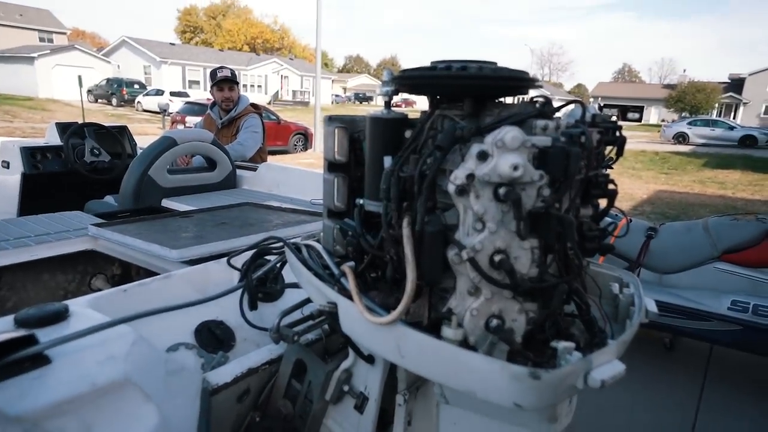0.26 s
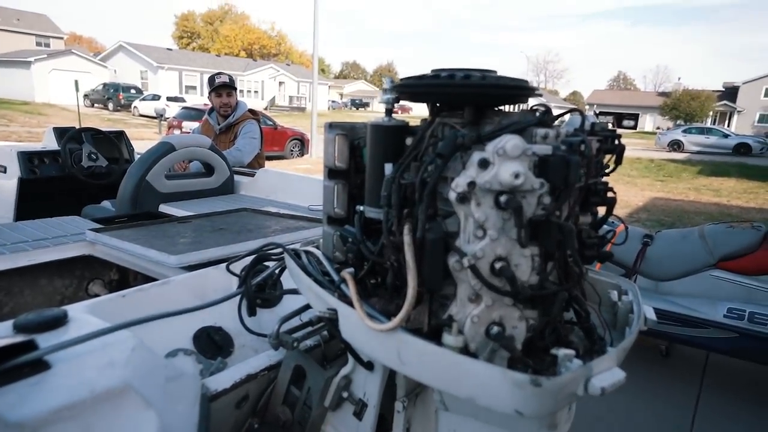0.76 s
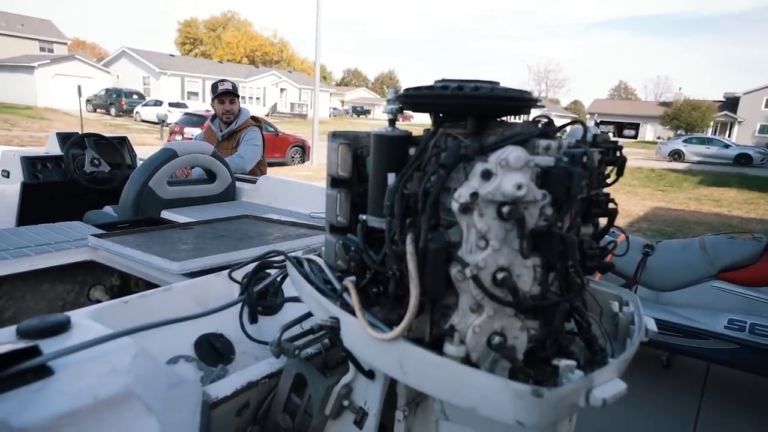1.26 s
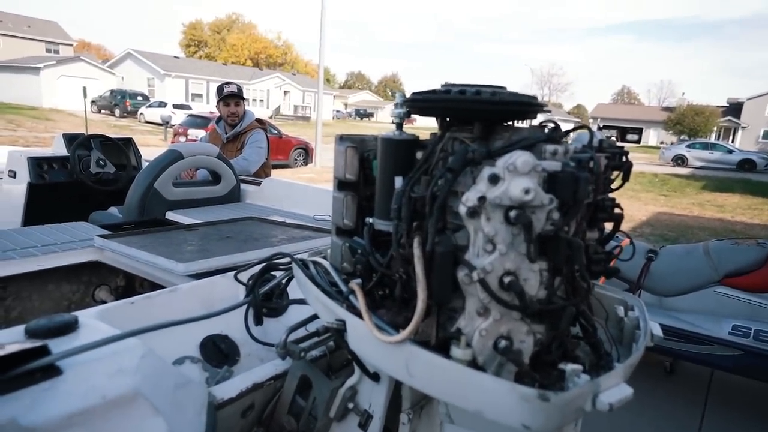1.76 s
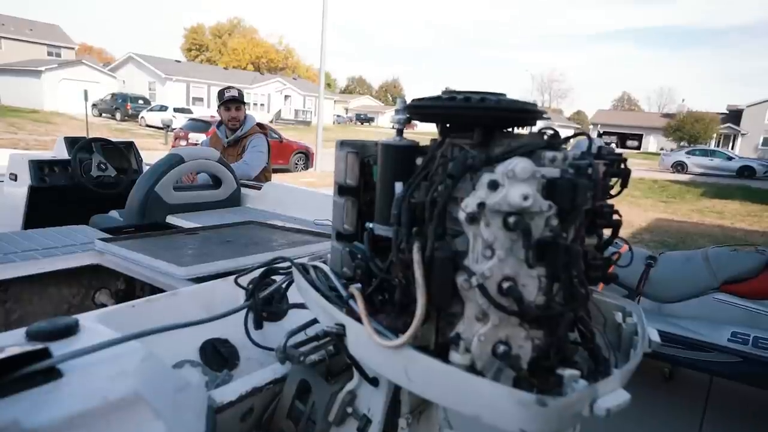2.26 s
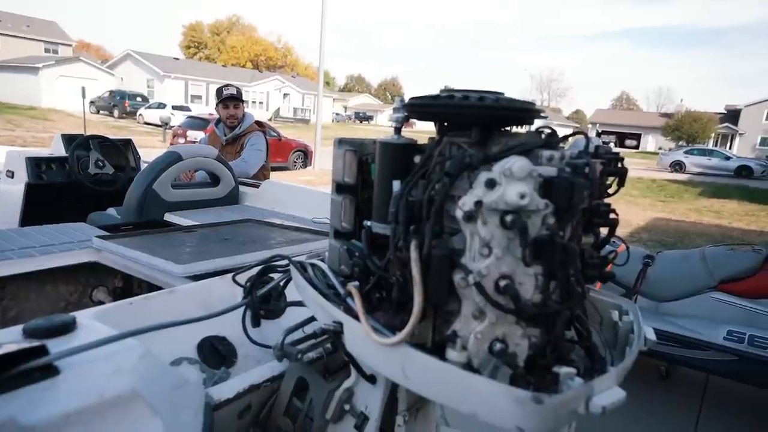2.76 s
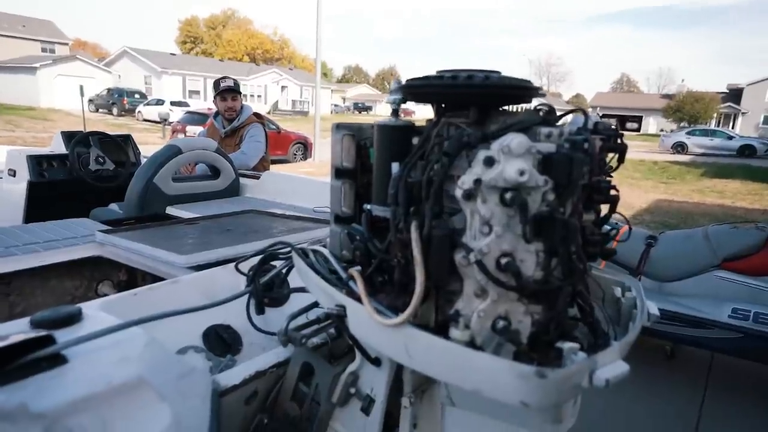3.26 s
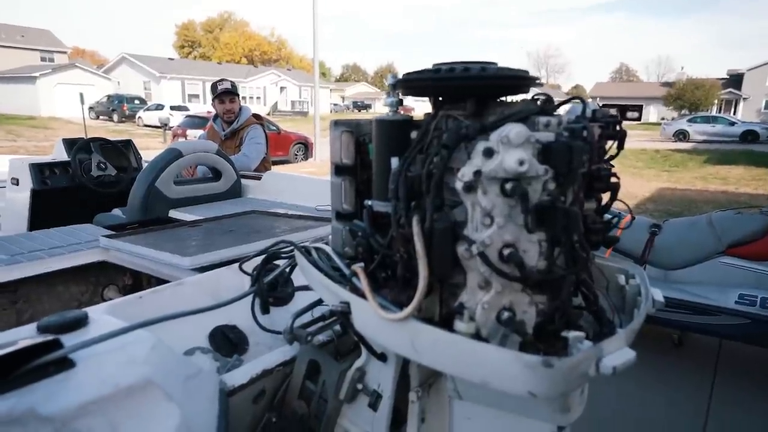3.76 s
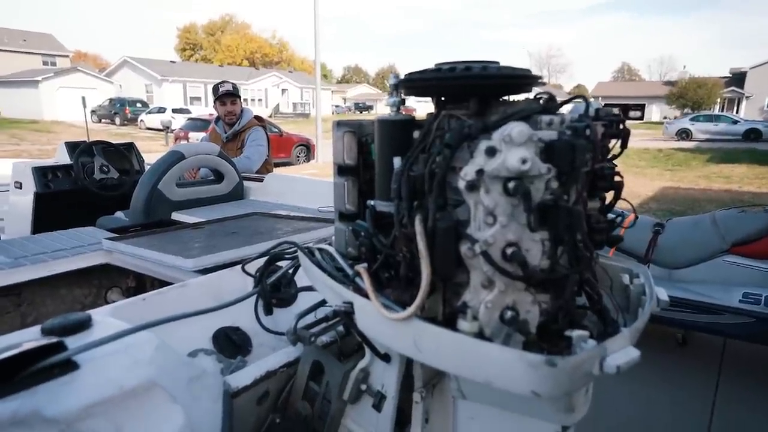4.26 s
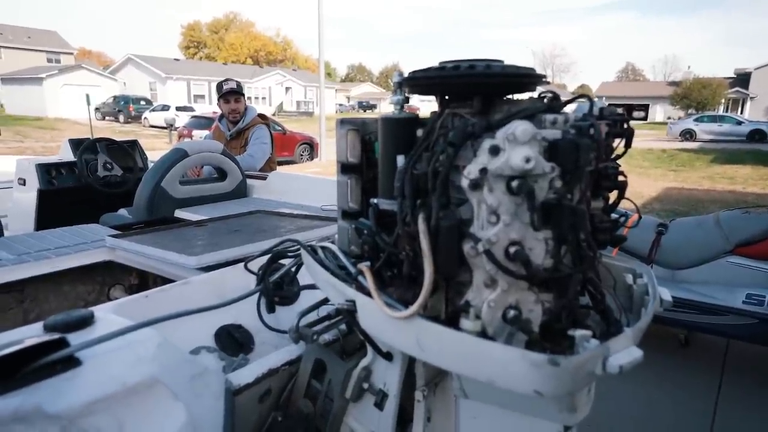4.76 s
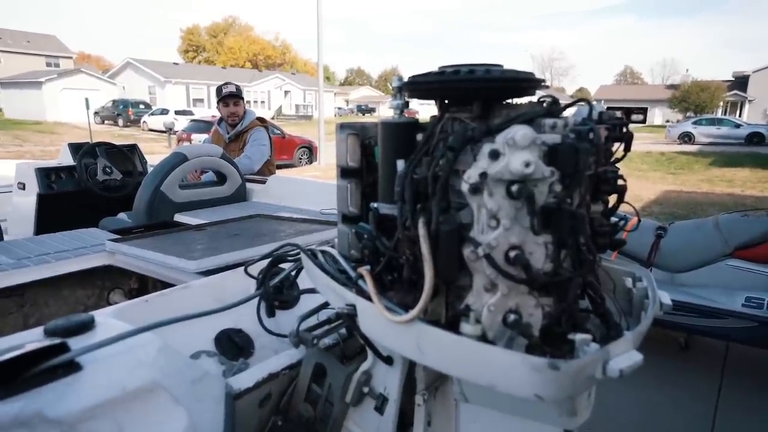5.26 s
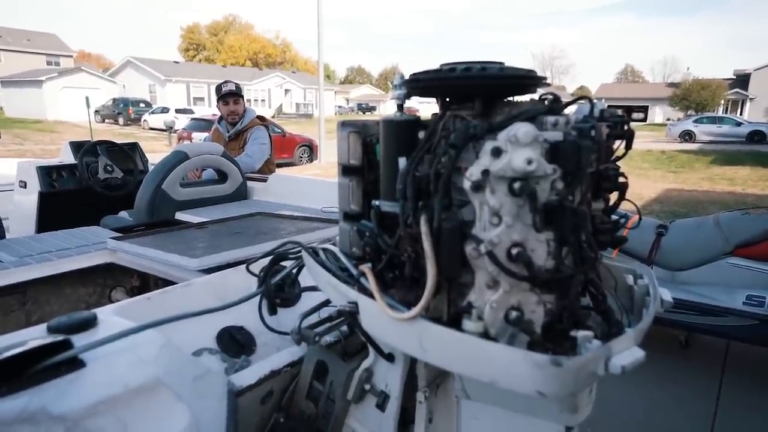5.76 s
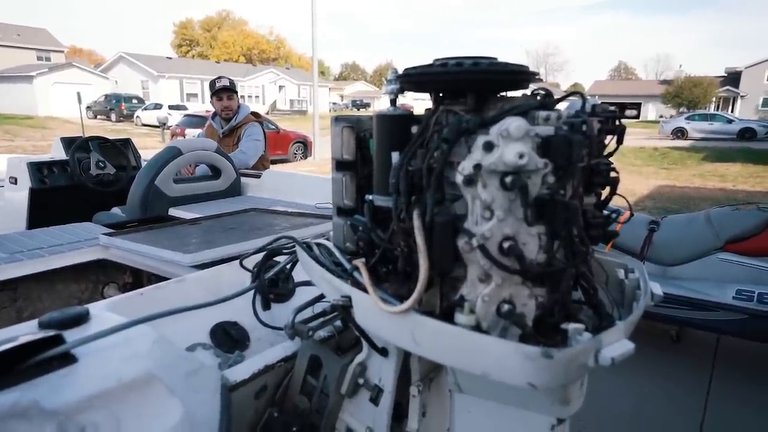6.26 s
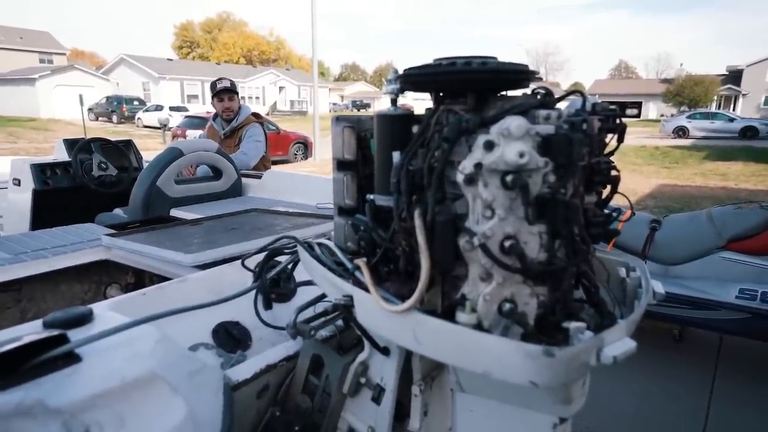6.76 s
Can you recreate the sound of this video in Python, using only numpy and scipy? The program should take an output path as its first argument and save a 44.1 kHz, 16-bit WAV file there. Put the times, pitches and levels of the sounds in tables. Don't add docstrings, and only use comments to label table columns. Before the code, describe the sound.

An outboard engine close by is cranked by its electric starter, knocking rhythmically without catching, pauses over trickling water, then cranks again.

```python
import sys
import numpy as np
from scipy import signal
from scipy.fft import rfft, irfft
from scipy.io import wavfile
from scipy.ndimage import uniform_filter1d

SR = 44100
rng = np.random.default_rng(int(sys.argv[2]) if len(sys.argv) > 2 else 0)


def to_wav(sig):
    pcm = np.clip(np.atleast_2d(sig), -1, 1) * 32767
    pcm = np.round(pcm).astype(np.int16)
    wavfile.write(sys.argv[1], SR, pcm.T)


def magnitude_from_level(level_db):
    exponent = np.asarray(level_db, float) / 20
    return 10 ** exponent


N = 309141
T = np.arange(N) / SR


def evened(x):
    return x / np.sqrt(np.mean(x ** 2) + 1e-20)


def add(mix, start_s, sound):
    part = mix[round(start_s * SR):][:len(sound)]
    part += sound[:len(part)]


def coloured(x, points):
    point_hz, point_db = np.transpose(points)
    hz = np.fft.rfftfreq(len(x), 1 / SR)
    curve_db = np.interp(np.log(hz + 1), np.log(point_hz + 1), point_db)
    return evened(irfft(rfft(x) * magnitude_from_level(curve_db), len(x)))


def band(x, lo_hz, hi_hz):
    return signal.sosfilt(signal.butter(3, [lo_hz, hi_hz], "band", fs=SR, output="sos"), x)


def grit(per_s, spread_db):
    size = magnitude_from_level(spread_db * np.minimum(rng.exponential(1, N), 4))
    sign = rng.choice([-1., 1.], N)
    return evened(size * sign * (rng.random(N) < per_s / SR))


def drift(per_s):
    knots_per_s = 400
    knots = rng.standard_normal(int(N / SR * knots_per_s) + 2)
    span = max(int(knots_per_s / per_s), 1)
    knots = evened(uniform_filter1d(uniform_filter1d(knots, span), span))
    return np.interp(T * knots_per_s, np.arange(len(knots)), knots)


def burst(t60_s, hz, width_hz, treble_db):
    t = np.arange(round(t60_s * SR)) / SR
    noise = rng.standard_normal(len(t)) * magnitude_from_level(-60 * t / t60_s) * np.minimum(t / 0.00035, 1)
    ring = signal.lfilter(*signal.iirpeak(hz, hz / width_hz, SR), noise)
    crack = signal.lfilter(*signal.butter(1, 2500, "high", fs=SR), noise * magnitude_from_level(-40 * t / t60_s))
    out = evened(ring) + magnitude_from_level(treble_db) * evened(crack)
    return out / abs(out).max()


# frequency in Hz, level in dB.
TRICKLE_COLOUR = [(70, -7), (190, 2.5), (500, -4), (1100, -9), (2500, -6.5), (4800, -3.5), (8000, -9.5),
                  (12000, -14), (16000, -26)]
# frequency in Hz, level in dB.
SPLASH_COLOUR = [(800, -53), (2000, 6), (4200, 9.5), (7000, 4), (12000, -14)]
# time in
# seconds, level in dB.
TRICKLE_LEVEL = [
    (.1, -51),
    (3.7, -40),
    (4.2, -41.5),
    (5.35, -38.5),
    (5.75, -38),
]


def trickle():
    drops = rng.standard_normal(N) + 0.62 * grit(700, 4.2)
    wash = coloured(drops, TRICKLE_COLOUR) * magnitude_from_level(2.55 * drift(70))
    splash_db = 7.5 * np.clip(drift(60), -2, 2) - 9.5
    splashes = coloured(rng.standard_normal(N), SPLASH_COLOUR) * magnitude_from_level(splash_db)
    return (wash + splashes) * magnitude_from_level(np.interp(T, *np.transpose(TRICKLE_LEVEL)) - 4.5)


# frequency in Hz, level in dB.
TRAFFIC_COLOUR = [(20, -5), (36, 1.5), (75, 2.5), (140, -5.5), (300, -23), (500, -41), (1000, -79)]
# time in seconds, level in dB, exhaust note in Hz.
PASSING = [
    (3.7, -56, 50),
    (4.2, -51.5, 50.1),
    (4.58, -46, 52.2),
    (4.8, -41.5, 67.3),
    (5.06, -42.5, 86.2),
    (5.27, -39, 58),
    (5.35, -49, 52.4),
    (5.75, -47, 49),
]


def traffic():
    time_s, level_db, note_hz = np.transpose(PASSING)
    phase = 2 * np.pi * np.cumsum(np.interp(T, time_s, note_hz)) / SR
    note = magnitude_from_level(1 + 0.5 * drift(9)) * np.sin(phase)
    rumble = magnitude_from_level(-1) * coloured(rng.standard_normal(N), TRAFFIC_COLOUR)
    return (rumble + note) * magnitude_from_level(np.interp(T, time_s, level_db))


def drone():
    level_db = np.interp(T, [4.3, 4.45], [-70, -55]) + 2 * drift(8)
    return magnitude_from_level(level_db) * np.sin(2 * np.pi * 495.3 * T)


# start in seconds, peak in dB, colour in Hz.
DRIPS = [(4.0326, -24.5, 4200), (4.074, -31, 3720), (4.1464, -28, 5450), (4.1708, -34, 4380),
         (4.2606, -27.5, 3090), (4.329, -24.5, 3780), (4.4672, -30, 3850), (4.5824, -15.5, 2070),
         (4.6607, -26, 4730), (4.7176, -25.5, 4840), (4.739, -28, 2400), (4.762, -28, 4370),
         (4.8528, -29, 5040), (4.9446, -31, 3110), (4.9725, -30, 2830), (5.0009, -26, 4710),
         (5.0528, -25, 3100), (5.1321, -25, 4950), (5.205, -34, 5030), (5.2279, -31, 3370),
         (5.4355, -26, 3670), (5.4624, -25, 2900), (5.4948, -26, 3410), (5.5342, -28, 4870),
         (5.5572, -28, 4020), (5.5771, -19, 4140)]


def drips():
    out = np.zeros(N)
    for start_s, db, hz in DRIPS:
        add(out, start_s, magnitude_from_level(db - 2) * burst(0.059, hz, 1600, -15))
    return out


def driveway(x):
    t = np.arange(9000) / SR
    sign = rng.choice([-1., 1.], len(t))
    taps = sign * (rng.random(len(t)) < .05) * magnitude_from_level(-60 * t / 0.17) * (t > .003)
    taps = signal.lfilter(*signal.butter(4, 5000, fs=SR), taps)
    return signal.oaconvolve(x, taps / np.linalg.norm(taps))[:N]


# time in seconds, gear rattle in dB, motor load in dB.
EFFORT = [
    [(0, -36.5, -31.5), (.05, -29, -34.5), (.11, -23.5, -29.5), (3.5, -23.5, -30), (3.63, -31, -27.5),
     (3.7, -26, -40), (3.78, -33.5, -42), (3.97, -41, -49), (4.05, -73, -58)],
    [(5.66, -28, -37), (5.72, -21, -29.5), (5.76, -27, -28.5), (5.83, -18, -31.5), (5.875, -30.5, -29),
     (5.91, -26, -64), (5.99, -23.5, -30.5), (6.3, -23.5, -29.5), (7.01, -24.5, -30)],
]


def effort(column):
    out = np.full(N, -120.)
    for rows in map(np.array, EFFORT):
        on = (T >= rows[0, 0]) & (T <= rows[-1, 0])
        out[on] = np.interp(T[on], rows[:, 0], rows[:, column])
    return out


def crackle():
    t = np.arange(200) / SR
    snap = rng.standard_normal(len(t)) * magnitude_from_level(-60 * t / 0.0047)
    snaps = signal.oaconvolve(grit(70, 4.5), snap)[:N]
    return magnitude_from_level(effort(column=1) - 26) * evened(band(snaps, 4500, 14600))


# top in seconds, knock in dB, upper ring in dB re knock, chirp in dB.
FIRST_RUN = [(0.145, -15, 4.5, -60), (0.293, -4.5, -3.5, -60), (0.423, -2.5, -5.5, -60),
             (0.55, -3.5, -3.5, -60), (0.682, -5, -3, -60), (0.803, -4, -2.5, -22), (0.925, -6.5, -7, -15),
             (1.055, -6, -1, -9), (1.184, -4.5, -2.5, -13), (1.308, -5.5, -3, -26), (1.439, -3, -1, -13),
             (1.567, -5, -3.5, -16), (1.69, -1.5, -5, -21), (1.827, -5, -5, -11), (1.952, -3.5, -7, -12),
             (2.074, -4.5, -1.5, -17), (2.206, -6, -3, -5), (2.331, -4.5, -2.5, -7),
             (2.454, -7.5, -2.5, -16), (2.583, -3.5, -3.5, -12), (2.71, -4.5, -4.5, -4),
             (2.83, -5.5, -3, -12), (2.96, -4.5, -1, -13), (3.086, -5, 0.5, -9), (3.209, -8, -0.5, -12),
             (3.336, -8.5, 1, -8), (3.462, -4, 0.5, -3), (3.578, -12, 1, -18)]
SECOND_RUN = [
    (5.802, -28, 9, -60),
    (5.996, -7.5, -4.5, -60),
    (6.127, -8.5, 2.5, -12),
    (6.256, -2.5, -5.5, -11),
    (6.382, -6, -4, -10.5),
    (6.504, -5.5, -4.5, -18),
    (6.629, -5, -3.5, -12),
    (6.753, -3, -2.5, -3.5),
    (6.872, -5.5, -0.5, -27),
    (6.992, -9.5, -3.5, -21),
]
STROKES = FIRST_RUN + SECOND_RUN


def turn():
    tops_s = [row[0] for row in STROKES]
    return 2 * np.pi / 3 * np.interp(T, tops_s, np.arange(len(STROKES)))


# offset from top in ms, colour in Hz, peak in dB for first, second and third cylinder.
TICK_CYCLE = [
    (-43, 3700, -21, -23, -19.5),
    (-33.5, 4900, -23, -15.5, -24),
    (-21, 14000, -38, -33, -39),
    (-4, 7000, -16.5, -18, -14.5),
    (44.5, 3700, -45, -15, -15.5),
]


def cycle_ticks():
    ticks = []
    for k, (top_s, *_) in enumerate(STROKES):
        for ms, hz, *cylinder_db in TICK_CYCLE:
            late, size, tune = np.clip(rng.standard_normal(3), -2, 2)
            start_s = top_s + ms / 1000 + 0.0017 * late
            ticks.append((start_s, cylinder_db[k % 3] + 2 * size, hz + 595 * tune))
    return ticks


# start in seconds, peak in dB, colour in Hz.
TICKS = [
    (3.6007, -16, 9700),
    (3.7249, -22, 5650),
    (3.7422, -5, 4940),
    (3.853, -26, 5890),
    (4.9172, -27, 7140),
    (4.95, -21, 5890),
    (5.1322, -23, 5120),
    (5.6354, -12, 5650),
    (5.66, -1.5, 7150),
]


def ticks():
    out = np.zeros(N)
    for start_s, db, hz in TICKS + cycle_ticks():
        add(out, start_s, magnitude_from_level(db - 3) * burst(0.018, hz, 5200, -11))
    return out


# start in seconds, peak in dB, treble in dB re ring, decay t60 in seconds, colour in Hz.
CLUNKS = [(3.6, -2, 13, 0.054, 8900), (3.7414, -4.5, 1, 0.039, 3700), (4.583, -21, -21, 0.17, 496),
          (4.584, -25, -25, .16, 1290), (5.575, -28.5, -15, 0.18, 520), (5.6354, -3.5, 2, 0.033, 3320),
          (5.6348, -18, -7, .03, 5860), (5.6621, -1.5, 11, 0.085, 6800), (5.662, -3, -20, .1, 1690),
          (5.907, -24, -16, .04, 5600), (3.899, -28, -6, .03, 1500)]


def clunks():
    out = np.zeros(N)
    for start_s, db, treble_db, t60_s, hz in CLUNKS:
        add(out, start_s, magnitude_from_level(db) * burst(t60_s, hz, 0.21 * hz + 150, treble_db))
    return out


# time in seconds, level in dB, pitch in Hz.
SQUEAL = [
    (3.893, -54, 2980),
    (3.9, -25.5, 2960),
    (3.915, -40, 3110),
    (3.932, -36, 2920),
    (3.94, -55, 2930),
]


def squeal():
    time_s, db, hz = np.transpose(SQUEAL)
    tone = np.sin(2 * np.pi * np.cumsum(np.interp(T, time_s, hz)) / SR)
    return magnitude_from_level(np.interp(T, time_s, db, -120, -120)) * tone


# multiple of the shaft speed, level in dB.
SHAFT_ORDERS = [(1, -14), (2, -7), (4, -1)]
# frequency in Hz, level in dB.
RUMBLE_COLOUR = [(20, -12), (45, 3), (100, 7.5), (135, -5.5), (200, 5.5), (340, -10), (500, 5), (700, -20),
                 (1100, -90)]
# share of turn, level in dB, pitch in Hz, length in ms.
THUMPS = [
    (0.109, -2.5, 93.5, 70),
    (0.163, 0, 171, 60),
    (.34, -5, 61, 70),
    (0.421, -8, 183, 50),
    (.46, -8.5, 94, 75),
    (.64, -25, 60, 74),
    (.72, -11, 93, 52),
    (.9, -5, 70, 80),
]
# time in seconds, whine level in dB.
WHINE = [
    (0, -44),
    (.06, -54),
    (.12, -27),
    (.2, -50),
]


def starter():
    shaft_hz, key_off_s, key_on_s, coast_s = 85.1, 3.62, 5.66, .9
    angle = turn()
    coasting_s = np.maximum(T - key_off_s, 0) * (T < key_on_s)
    sag = 1 + .07 * np.cos(angle - .6) + 0.01934 * drift(20.04)
    cycles = np.cumsum(shaft_hz * np.exp(-coasting_s / coast_s) * sag) / SR
    hum = sum(magnitude_from_level(db + 3 * drift(25)) * np.sin(2 * np.pi * k * cycles) for k, db in SHAFT_ORDERS)
    swell_db = -2.5 + 2.6 * np.cos(angle - .7) + 3.2 * np.cos(3 * angle - 2.2)
    low = hum * magnitude_from_level(swell_db) + coloured(rng.standard_normal(N), RUMBLE_COLOUR)
    for share, db, hz, ms in THUMPS:
        t = np.arange(round(ms / 1000 * SR)) / SR
        thump = magnitude_from_level(db + 6) * np.hanning(len(t)) * np.sin(2 * np.pi * hz * t)
        for middle_s in np.interp(np.arange(13) + share, angle / (2 * np.pi), T, right=T[-1]):
            add(low, max(middle_s - t[-1] / 2, 0), thump)
    whine_gain = magnitude_from_level(np.interp(T, *np.transpose(WHINE), right=-120)) + magnitude_from_level(effort(column=1) - 10)
    whine = whine_gain * np.sin(2 * np.pi * 1648 * T + 1.9 * drift(40))
    return magnitude_from_level(effort(column=2)) * low + whine


def chirps():
    out, t = np.zeros(N), np.arange(700) / SR
    for top_s, _, _, db in STROKES:
        stretch, glide, tune = rng.uniform(-1.3, 1, 3)
        u = t / (0.0016 * (1 + .17 * stretch))
        flutter = 0.045 * u * np.exp(-u / 2.9) * np.cos(2 * np.pi * 180 * t)
        shape = u ** 4 * np.exp(4 - 4 * u) + flutter
        hz = 13730 + 198 * tune
        whistle = np.sin(2 * np.pi * hz * (t + (3.1 * glide - 1.5) * t ** 2))
        add(out, top_s - .0025, magnitude_from_level(db) * shape * whistle)
    return out


# time in seconds, knock in dB, upper ring in dB re knock, hiss in dB re knock, spread in ms.
SHOCKS = [
    (3.592, -0.5, -4.5, -31, 3.6),
    (3.656, -18.5, -1.5, -37, 21),
    (3.745, -15, -3, -23, 4.7),
    (5.638, -20.5, -21, -40, 10),
    (5.66, -2.5, -1, -40, 11.2),
]


def blows():
    usual_knock_db, leak_db, spread_ms = -4.5, -25.5, 9.6
    strokes = []
    for top_s, db, upper_db, _ in STROKES:
        hiss_db = leak_db + 0.38 * (db - usual_knock_db) - db
        strokes.append((top_s, db, upper_db, hiss_db, spread_ms))
    return strokes + SHOCKS


# frequency in Hz, level in dB.
HISS_COLOUR = [(2500, -54), (4000, -16), (5000, 0), (6100, -3.5), (6750, 2.5), (7500, -6), (10000, -5),
               (12500, -12.5), (14500, -23), (16000, -9)]


def hiss():
    level = magnitude_from_level(effort(column=1) - 22.5)
    t = np.arange(-3000, 2600) / SR
    rise = np.exp(-abs(t / .042) ** 3) * (1 + t / .1)
    puff = np.where(t < 0, rise, np.exp(-t / .013))
    for top_s, db, _, hiss_db, _ in blows():
        add(level, top_s - 3000 / SR, magnitude_from_level(db + hiss_db - 6.5) * puff)
    air = .8 * rng.standard_normal(N) + .5 * grit(1500, 3.4)
    return level * magnitude_from_level(2.6 * drift(120)) * coloured(air, HISS_COLOUR)


def ringing(drive, modes, wander_db):
    out = np.zeros(N)
    for hz, width_hz, db in modes:
        r, w = np.exp(-np.pi * width_hz / SR), 2 * np.pi * hz / SR
        wandering = drive * magnitude_from_level(wander_db * drift(45))
        ring = signal.lfilter([1, 0, -1], [1, -2 * r * np.cos(w), r * r], wandering)
        out += magnitude_from_level(db) * np.sqrt(width_hz / SR) * ring
    return out


# frequency in Hz, width in Hz, level in dB.
BLOCK_LOW = [(329, 165, -2.5), (420, 100, -16), (580, 150, -5.5), (678, 61, -8.5), (761.3, 54.5, 3),
             (865, 125, 0.5), (1051, 49, -1), (1132, 36, -5), (1197, 56, -2), (1155, 23, -17)]
BLOCK_HIGH = [(1541, 31, -3.5), (1703, 102, 2), (1831, 74, -3.5), (1920, 100, -7), (2000, 200, -6.5),
              (2554, 25, -19.5), (2760, 490, -9), (3050, 160, -10.5), (3522, 280, -3), (3850, 94, -11.5)]
FLYWHEEL = [(1646, 16, 1.5), (4096, 45, -6.5)]


def block():
    full_rattle_db, dulling = -23.5, 0.79
    rattle_db = effort(column=1)
    low = magnitude_from_level(rattle_db + 1.02 * drift(45) - 1.5)
    high = low * magnitude_from_level(dulling * np.minimum(rattle_db - full_rattle_db, 0) - 2.5)
    for top_s, db, upper_db, _, spread_ms in blows():
        u = np.arange(5000) / SR / (spread_ms / 1000)
        blow = (1 - np.exp(-u / 0.66)) * (np.exp(-u ** 2 / 2.76) + 0.72 * np.exp(-u / 2.64))
        add(low, top_s - .004, magnitude_from_level(db - 9) * blow)
        add(high, top_s - .004, magnitude_from_level(db + upper_db - 6.5) * blow ** 2.17)
        add(high, top_s - .034, magnitude_from_level(db + upper_db - 38) * np.hanning(1700))
    contacts = 0.69 * grit(3000, 2.3) + 0.5 * rng.standard_normal(N)
    contacts *= magnitude_from_level(1.37 * drift(180) - 1.33)
    lower_ring = band(ringing(low * contacts, BLOCK_LOW, 2.5), 270, 1281)
    upper_ring = band(ringing(high * contacts, BLOCK_HIGH + FLYWHEEL, 3.74), 1616, 4100)
    return lower_ring + upper_ring


def scene():
    yard = trickle() + traffic() + drone()
    strikes = ticks() + drips() + clunks() + squeal()
    close = block() + hiss() + chirps() + strikes
    echo = magnitude_from_level(-21.5) * driveway(close)
    return (close + echo + starter() + yard + crackle())[None]


def roll_off(x):
    return signal.sosfilt(signal.butter(12, 16640, fs=SR, output="sos"), x)


def record(dry):
    limited = np.tanh(dry * 1.1) * .98
    treble_limit = signal.firwin(401, 15900, window=("kaiser", 8), fs=SR)
    mix = signal.oaconvolve(limited, treble_limit[None], "same")
    return roll_off(mix)


dry = scene()
out = record(dry)
to_wav(out)
```